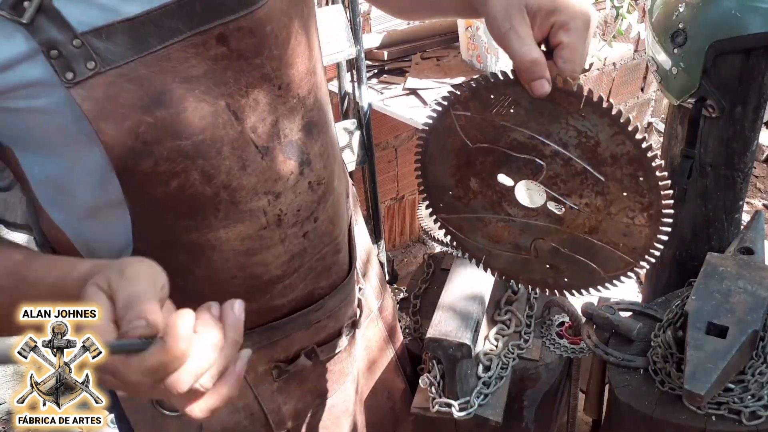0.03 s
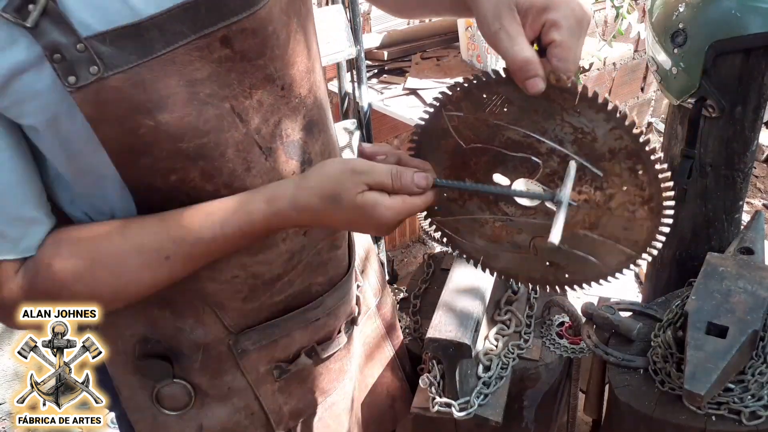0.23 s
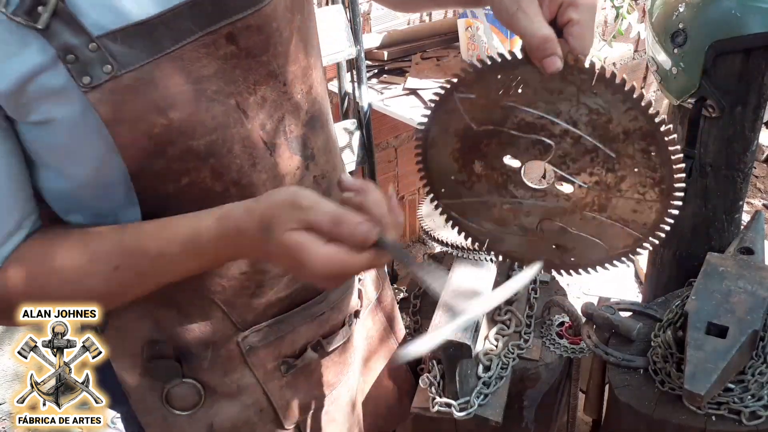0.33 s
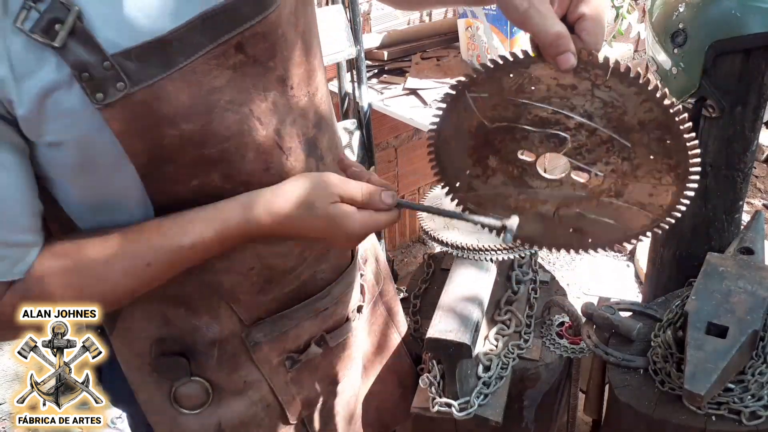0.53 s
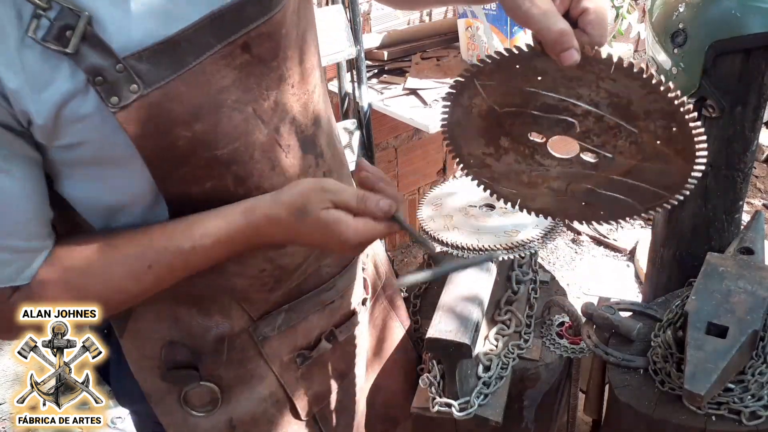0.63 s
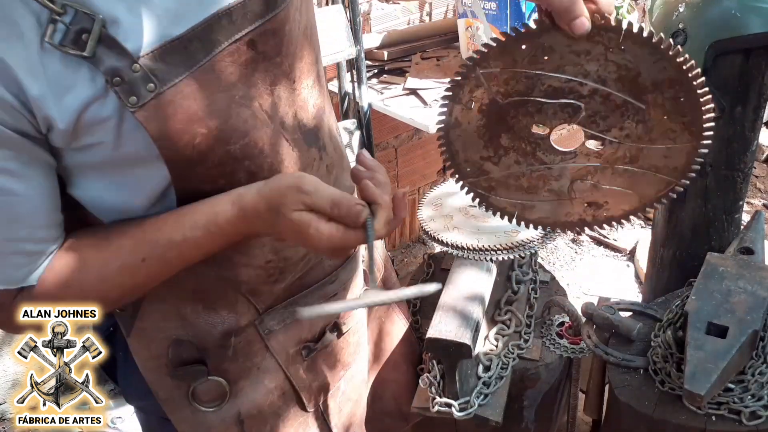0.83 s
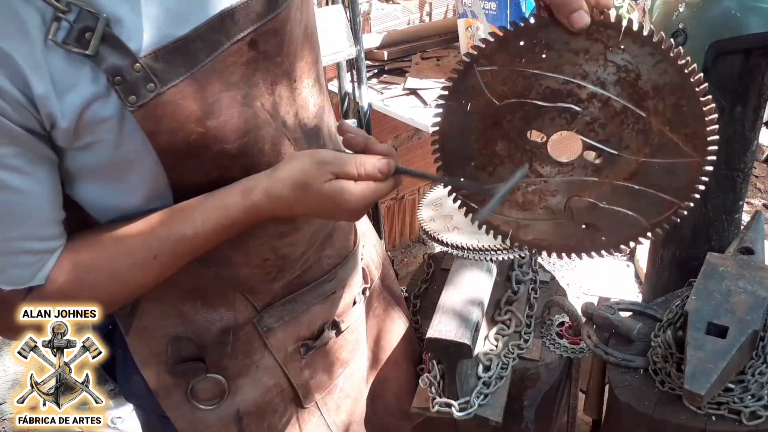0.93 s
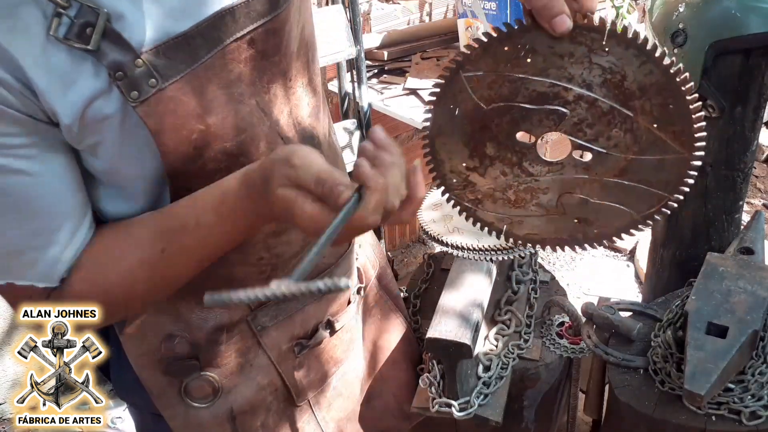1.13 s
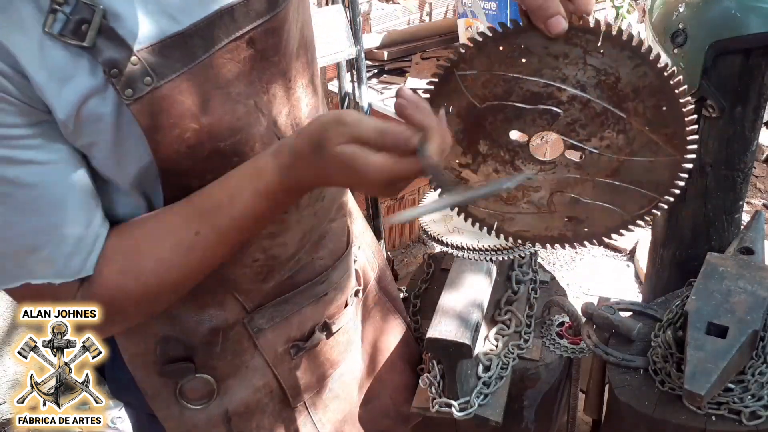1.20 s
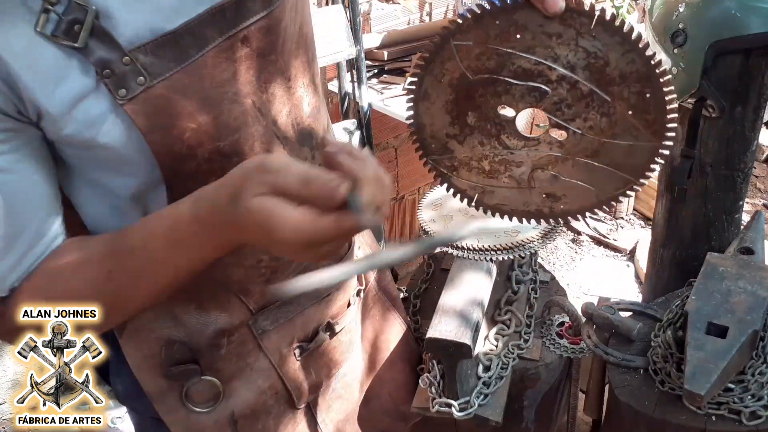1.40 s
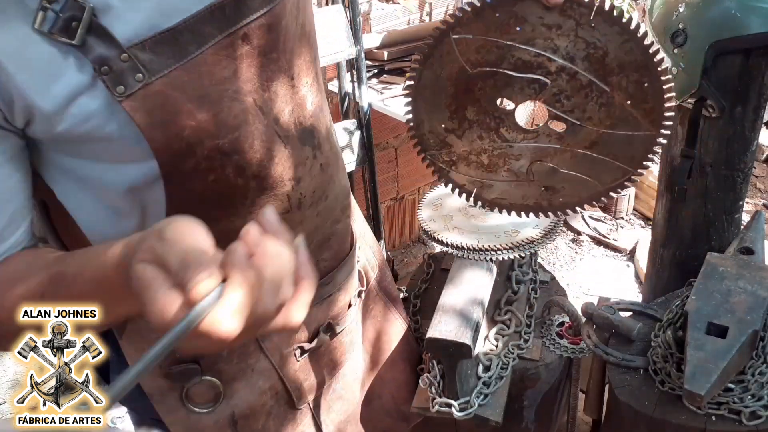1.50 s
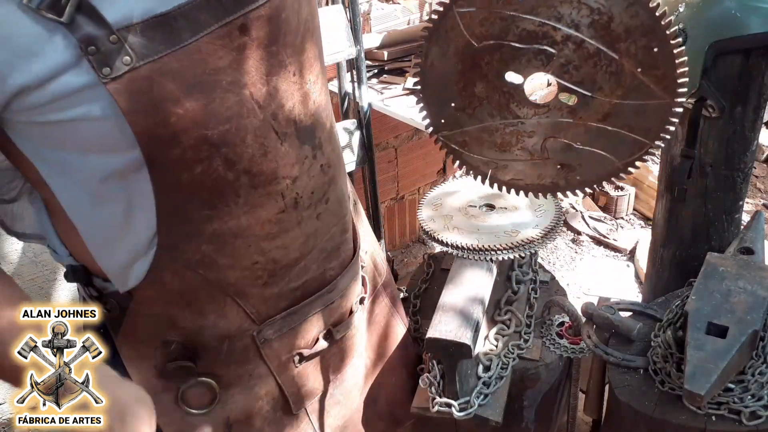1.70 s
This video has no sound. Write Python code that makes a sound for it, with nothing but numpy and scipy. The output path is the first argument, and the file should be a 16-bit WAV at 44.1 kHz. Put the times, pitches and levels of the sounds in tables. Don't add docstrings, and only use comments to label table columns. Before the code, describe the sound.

Close stereo sound of steel striking a large saw blade: a faint leftover ring, then five uneven blows with harsh clang, short boom and gong-like shimmer, the last left ringing over a quiet open yard.

```python
import sys
import numpy as np
from scipy import signal
from scipy.fft import rfft, irfft
from scipy.io import wavfile
from scipy.ndimage import uniform_filter1d

SR = 44100
rng = np.random.default_rng(int(sys.argv[2]) if len(sys.argv) > 2 else 0)


def gain_from_db(level_db):
    decades = np.asarray(level_db, float) / 20
    return 10 ** decades


def generate_wav(sig):
    pcm = np.round(np.clip(np.atleast_2d(sig).T, -1, 1) * 32767).astype(np.int16)
    wavfile.write(sys.argv[1], SR, pcm)


N = 77175


def read(points, hz):
    f, value = np.transpose(points)
    return np.interp(np.log(hz + 1), np.log(f + 1), value)


def noise(points, same):
    a, b = rng.standard_normal((2, N))
    pair = np.array([a, same * a + np.sqrt(1 - same ** 2) * b])
    spectrum = rfft(pair) * gain_from_db(read(points, np.fft.rfftfreq(N, 1 / SR)))
    x = irfft(spectrum, N)
    return x / x.std()


def tone(hz, lead):
    return np.sin(2 * np.pi * hz * np.arange(N) / SR + np.array([[lead], [0]]))


BLOWS_S = [
    .2437,
    .5385,
    .7045,
    .9648,
    1.2637,
]


def since():
    t, at = np.arange(N) / SR, np.array(BLOWS_S)
    k = np.searchsorted(at, t, "right") - 1
    return t, k, np.where(k < 0, 0, t - at[k])


DRIFT = [1, 1, 1.0005, 1.0001, 1]


def ringing(hz, t60, size, turn):
    out = np.zeros((2, N))
    edges = [round(s * SR) for s in BLOWS_S] + [N]
    for j, drift in enumerate(DRIFT):
        step = np.exp((2j * np.pi * hz * drift - np.log(1000) / t60) / SR)[:, None]
        n = edges[j + 1] - edges[j]
        blocks = step ** (np.arange(n // 128 + 1) * 128)
        start = (size[:, j] * np.exp(1j * turn[j]))[:, :, None] * blocks
        ring = np.einsum("cmb,mi->cbi", start, step ** np.arange(128), optimize=True).imag
        out[:, edges[j]:edges[j + 1]] = ring.reshape(2, -1)[:, :n]
    return out


# (frequency [Hz], level [dB])
YARD = [(30, -12), (170, -28.5), (350, -8), (900, -19), (12000, -35.5)]


def yard():
    return gain_from_db(-66) * noise(YARD, 0.4)


# (frequency [Hz], level at start [dB], t60 [s])
EARLIER = [(571, -38.5, 1.7), (1070.3, -34.5, 4.5), (2176, -64, 10), (3274, -54, 1.5), (3340, -64, 3.9),
           (4310, -67, 10)]


def earlier_ring():
    t, k, age = since()
    return sum(gain_from_db(db - 60 * t / t60) * tone(hz, 0.1) for hz, db, t60 in EARLIER) * (k < 0)


# (frequency [Hz], level [dB])
FLAP = [(97, 10), (112, 3)]
# (time [s], level [dB])
SWING = [
    (.24, -96),
    (.9, -72),
    (1.08, -58),
    (1.25, -56),
    (1.36, -71),
    (1.54, -48.5),
    (1.75, -55),
]


def flap():
    t = np.arange(N) / SR
    return sum(gain_from_db(db) * tone(hz, 0.1) for hz, db in FLAP) * gain_from_db(np.interp(t, *np.transpose(SWING)))


def look_ahead():
    t, k, age = since()
    coming = np.append(BLOWS_S, np.inf)[k + 1]
    return gain_from_db(-9 * np.exp((t - coming) / 0.0035))


# (frequency [Hz], level [dB])
CLANG = [(300, -48), (1000, -1), (3300, -3.5), (8500, -10.5), (10400, -16.5), (15500, -10)]
CLANG_SAME = 0.054


def graze():
    t, k, age = since()
    swell = np.exp(np.minimum(t - BLOWS_S[0], 0) / 0.0014)
    return gain_from_db(-16) * swell * (k < 0) * noise(CLANG, CLANG_SAME)


KICK_DB = [-6, -1, 0, 2, 3]


def kick():
    t, k, age = since()
    u = np.maximum(age - 0.0002, 0)
    return -gain_from_db(KICK_DB)[k] * np.sin(2 * np.pi * 850 * u) * np.exp(-u / 0.0012)


def attack(age):
    return np.minimum(age / 0.0018, 1)


# (clang [dB], clang length [s], thud [dB], fine modes [dB])
BLOWS = [
    (-6.5, 0.035, -7, -31),
    (-8.5, 0.037, -12, -30.5),
    (-8, 0.027, -12.5, -32),
    (-9.5, 0.032, -14, -35.5),
    (-6.5, 0.031, -14, -30),
]
# (frequency [Hz], level [dB])
THUD = [(35, -51), (70, -7.5), (320, -0.6), (800, -3), (1500, -10), (3000, -63)]


def clang():
    t, k, age = since()
    clang_db, length_s, thud_db, _ = np.array(BLOWS)[k].T
    late = np.maximum(age - length_s, 0)
    shape = gain_from_db(-8.5 * age / length_s - 20 * late / 0.033)
    rattle = uniform_filter1d(rng.standard_normal(N), size=round(0.002 * SR))
    rough = gain_from_db(clang_db + 1.2 * rattle / rattle.std()) * noise(CLANG, CLANG_SAME)
    return attack(age) * shape * (rough + gain_from_db(thud_db) * noise(THUD, 0.1))


DUCK_DB = [-6.5, -11.5, -5, -4, -10]


def duck():
    t, k, age = since()
    u = age / np.array(BLOWS)[k, 1]
    gain = gain_from_db(np.array(DUCK_DB)[k] * np.cos(np.pi / 2 * np.clip(u / 1.86, 0, 1)) ** 2)
    return np.where(k < 0, 1, attack(age) * gain)


GAPS_HZ = [2840, 3860, 5170, 5790, 7240, 8890, 10400, 11480, 12950]


def gaps(hz):
    return -20 * np.exp(-((hz[:, None] - GAPS_HZ) / 100) ** 2).sum(1)


# (frequency [Hz], level per Hz [dB])
MURK = [(30, -17), (300, -9.5), (1500, -8.5), (8000, -24), (13000, -71)]


def murk():
    t, k, age = since()
    spectrum = rfft(noise(MURK, 0.22)) * gain_from_db(gaps(np.fft.rfftfreq(N, 1 / SR)))
    return attack(age) * gain_from_db(-40.5 - 60 * age / 0.82) * irfft(spectrum, N)


# (frequency [Hz], t60 [s], left lead [rad])
BODY = [(312.8, 0.13, 1.5), (379, 0.11, 2.9), (71, 0.11, 2.7)]
BODY_DB = [(-5, -29, -20.5, -12.5, -16), (-16.5, -7, -8, -27, -42), (-26, -38, -14.5, -40, -48)]


def body():
    hz, t60, lead = np.transpose(BODY)
    return ringing(hz, t60, gain_from_db(BODY_DB), [lead * [[1], [0]] + np.pi] * len(BLOWS_S))


DISC_HZ = [569.7, 1070.4, 1488.3, 1649, 1863, 2252, 2515.5, 2567.5, 2675.6, 3051, 3276.2, 3342.2, 4067,
           4292]
# (t60 [s], left lead [rad], peak [dB] at each of the five struck spots)
DISC = [(10.7, 0.36, -24, -31, -28, -35.5, -38.5), (2.46, 0.13, -21, -10.5, -10, -6, -13.5),
        (1.09, 0.3, -17.5, -14.5, -25, -33.5, -19.5), (0.54, 1.32, -32, -25, -22.5, -21, -24),
        (0.48, -2.9, -14.5, -22.5, -39, -19.5, -16.5), (0.68, -0.51, -27.5, -44, -30, -54, -25),
        (0.76, -0.79, -17, -36, -28.5, -32.5, -17.5), (0.4, 0.49, -15, -27, -14.5, -38.5, -11.5),
        (1.35, 1.47, -20.5, -28, -29, -37.5, -39), (0.59, -0.9, -15.5, -23.5, -34, -44, -64),
        (2.6, 1.25, -25.5, -29.5, -28.5, -29.5, -33), (2.44, 1.17, -25, -37, -32.5, -18.5, -26),
        (0.79, 0.25, -27, -24.5, -52, -28, -23.5), (2.16, 1.56, -23, -23, -24.5, -31.5, -24)]
SWEPT = [0, 10, 11, 13]
# (sweeps [per s], depth [dB], phase [rad] at each of the five blows)
TWINS = [(2.6, -15.5, -2.5, 4, 6.5, 14, 2.5), (4.1, 0.5, 4, 0, -2, -2, 6.5),
         (4.08, 0, -5.5, -2, 2, -2.5, -3), (7, -17, 0.5, 2, -3.5, 3.5, -5.5)]


def disc():
    hz, rows, twins = np.array(DISC_HZ), np.array(DISC), np.array(TWINS)
    t60, lead = rows[:, 0], rows[:, 1] * [[1], [0]]
    main = ringing(hz, t60, gain_from_db(rows[:, 2:]), [lead] * len(BLOWS_S))
    size = gain_from_db(rows[SWEPT, 2:] + twins[:, 1:2])
    turn = twins[:, 2:].T[:, None] + 0.17 * lead[:, SWEPT]
    return main + ringing(hz[SWEPT] + twins[:, 0], 0.47 * t60[SWEPT], size, turn)


def modes(hz, t60, spot_db):
    draw = rng.random((len(hz), 32)).T
    turn = 2 * np.pi * draw[:30].reshape(3, 5, 2, -1)
    up, down = 2.7 + 0.0028 * hz * draw[30:]
    side = gain_from_db(spot_db - 5)
    brief = np.minimum(0.73 * t60, 0.41)
    main = ringing(hz, t60, gain_from_db(spot_db), turn[0])
    return main + ringing(hz + up, brief, side, turn[1]) + ringing(hz - down, brief, side, turn[2])


RIM_HZ = [3480, 3673, 4483, 4609, 4814, 4980, 5373, 5416, 5657, 7838, 9079, 9546, 3007, 7547]
ROD_HZ = [5512, 5963, 6089, 6481, 6922, 7090, 8247, 8308, 8718, 9259, 13639, 13854, 14758, 15356]
WEB_HZ = [1403, 1925, 2353, 2431, 2947, 3426, 3569, 5257, 6263, 6328, 6802, 6858, 7351, 8411, 8589, 9176,
          9464, 9698, 10034, 10546, 10947, 11256, 11606, 12417, 14901]
# (t60 [s], peak [dB] at each of the five struck spots)
RIM = [(0.62, -18, -23, -47, -34, -22.5), (0.57, -22, -30.5, -35, -30, -27.5),
       (0.49, -11, -13.5, -54.5, -25, -23), (1.1, -18, -47, -62, -48, -49), (0.44, -29, -53, -36, -26, -32),
       (0.55, -23, -35, -16, -23.5, -20), (0.37, -37, -15, -37, -25.5, -29),
       (0.68, -21.5, -25, -21.5, -19, -28), (2.3, -45, -42, -42, -54, -34.5),
       (0.67, -28.5, -22.5, -48, -42, -26.5), (0.82, -32, -29, -36, -32.5, -31.5),
       (0.78, -53, -72, -57, -36, -28), (0.75, -26, -20, -34.5, -54, -43), (0.28, -28, -27, -11, -33, -25)]
ROD = [(0.26, -26.5, -4, -21, -8.5, -12.5), (0.26, -28, -8, -35, -14, -9), (0.36, -30, -12, -41, -9, -16.5),
       (0.3, -5, -42, -30, -36, -11), (0.31, -13, -29, -20.5, -27, -9.5), (0.24, -37, -9, -36, -20, -16),
       (0.21, -14.5, -1.5, -12, -5, -21), (0.29, -19, -26, -21, -15, -38), (0.18, -11, -43, -35, -12, -16),
       (0.21, -19, -22, -42, -15, -49), (0.24, -26, -20, -31, -18, -7), (0.3, -28, -22, -47, -34, -31),
       (0.23, -51, -32, -5, -38, -7.5), (0.18, -29, -40, -7, -19, -46)]
WEB = [(1.04, -62, -24, -47.5, -59, -33.5), (0.34, -36, -30, -20, -28.5, -43),
       (1.1, -43.5, -48, -34, -36, -59), (0.24, -15, -24, -26, -30, -23), (3, -37, -35, -54, -49, -37),
       (0.22, -48, -13, -36.5, -41, -10), (0.18, -12, -23, -43, -46, -16),
       (0.43, -47, -22, -23.5, -21, -49), (0.24, -37, -34, -36, -15.5, -34), (0.2, -42, -31, -34, -42, -37),
       (0.33, -38, -23, -27, -39, -26), (0.32, -31, -22, -30, -25, -18), (0.28, -35, -9.5, -23, -38, -59),
       (0.32, -14, -41, -45, -40, -32), (0.24, -37, -50, -39, -8, -31), (0.25, -32, -13, -31, -29, -38),
       (0.39, -41, -54, -37, -34, -32), (0.1, -39, -20, -18, -16, -20.5), (0.43, -43.5, -64, -47, -44, -22),
       (0.47, -38, -23, -82, -32, -55), (0.51, -42, -29, -46, -37, -26), (0.78, -57, -58, -44, -58, -38),
       (0.2, -67, -26, -22, -43, -35), (0.24, -26, -30, -57, -45, -35), (0.26, -31, -42, -50, -36, -26)]


def rim_rod_web():
    hz = np.concatenate([RIM_HZ, ROD_HZ, WEB_HZ]).astype(float)
    steel = np.concatenate([RIM, ROD, WEB])
    return modes(hz, steel[:, 0], steel[:, 1:])


# (frequency [Hz], level [dB])
FINE_COLOUR = [(1300, -21.5), (4000, -4), (8500, 1), (10500, -4.5), (14500, 3)]


def fine(count=520):
    draw = rng.standard_normal((count, 6))
    hz = 1300 + 14300 * rng.random(count)
    t60 = 0.37 * (hz / 4000) ** -0.62 * np.exp(0.25 * draw[:, 5])
    colour = read(FINE_COLOUR, hz) + gaps(hz)
    return modes(hz, t60, np.array(BLOWS)[:, 3] + colour[:, None] + 5.0 * draw[:, :5])


# (frequency [Hz], level [dB], t60 [s])
FAINT = [(178, -56, 3.8), (195, -40.5, 1.4), (296, -64, 6.6), (367, -58, 17), (826, -38, 0.47),
         (2200, -48.5, 7.2), (11256, -57.5, 2.6)]


def faint():
    t, k, age = since()
    return sum(gain_from_db(db - 60 * age / t60) * tone(hz, 0.44) for hz, db, t60 in FAINT) * (k >= 0)


def scene():
    gain = duck()
    clear = disc() + earlier_ring() + faint() + flap()
    steel = rim_rod_web() + fine()
    ring = gain * clear + gain ** 1.21 * steel
    blade = clang() + murk() + kick() + body() + graze() + look_ahead() * ring
    return blade * gain_from_db([[0.89], [-0.89]]) + yard()


def top_cut(x):
    return signal.sosfilt(signal.butter(12, 15760, fs=SR, output="sos"), x)


def record(dry):
    ceiling = 1.25
    x = ceiling * np.tanh(dry / ceiling)
    x = signal.lfilter(*signal.butter(1, 35, "high", fs=SR), x)
    x = signal.oaconvolve(x, signal.firwin(255, 15700, fs=SR)[None], "same")
    mix = np.clip(x, -1, 1)
    return top_cut(mix)


dry = scene()
out = record(dry)
generate_wav(out)
```